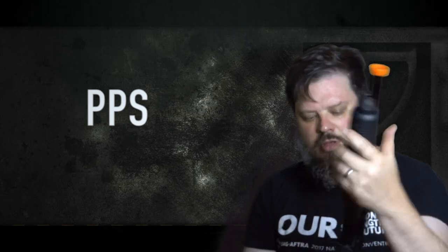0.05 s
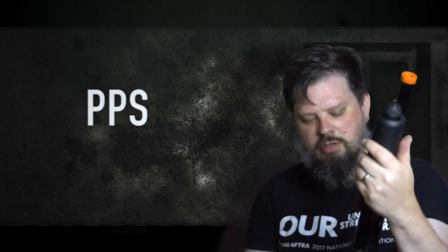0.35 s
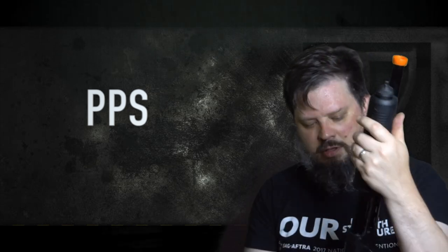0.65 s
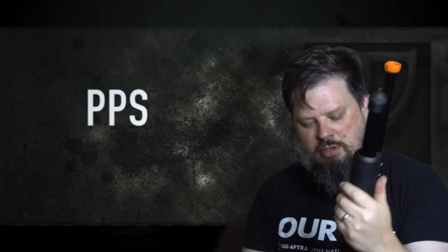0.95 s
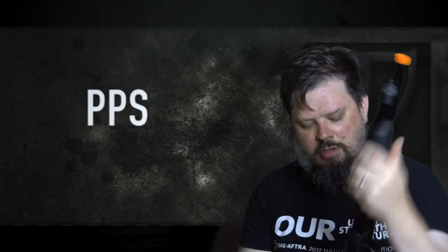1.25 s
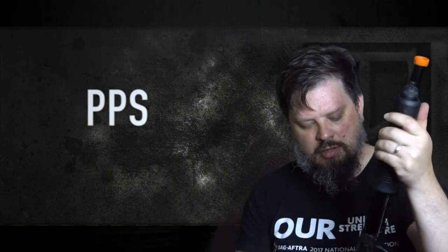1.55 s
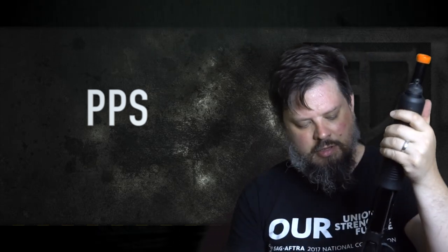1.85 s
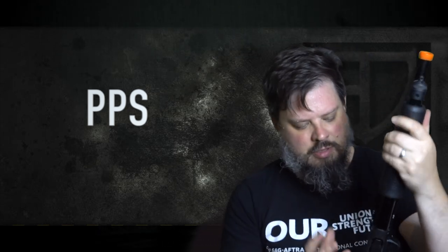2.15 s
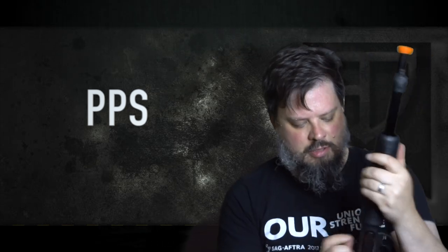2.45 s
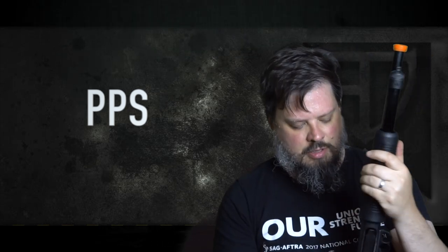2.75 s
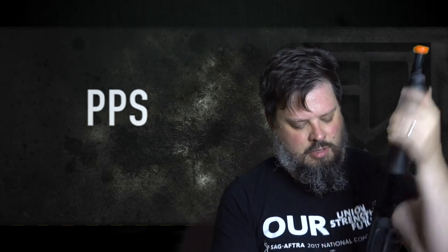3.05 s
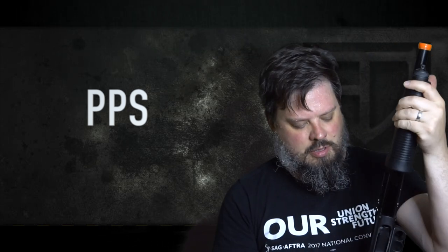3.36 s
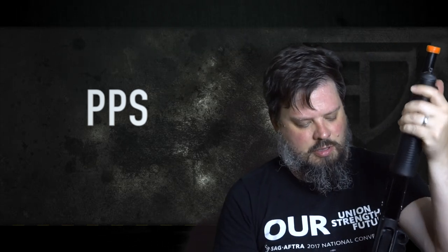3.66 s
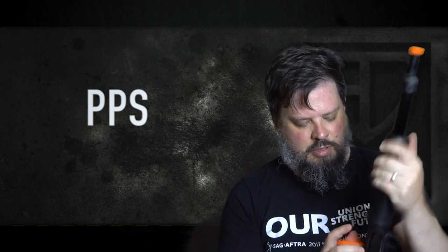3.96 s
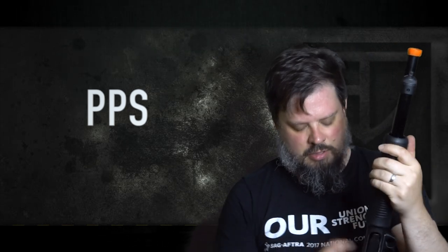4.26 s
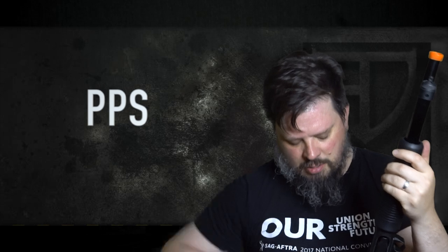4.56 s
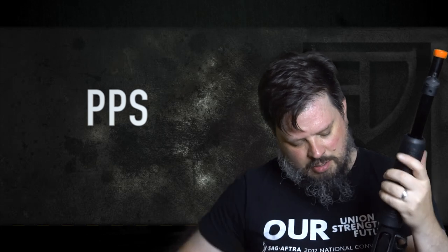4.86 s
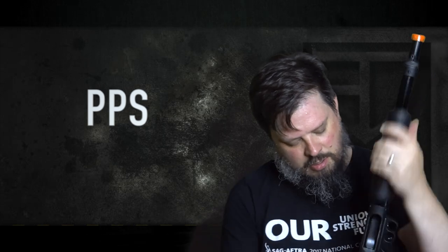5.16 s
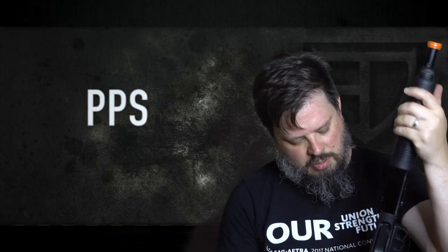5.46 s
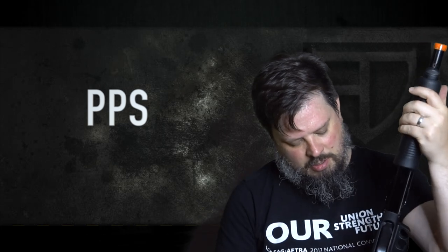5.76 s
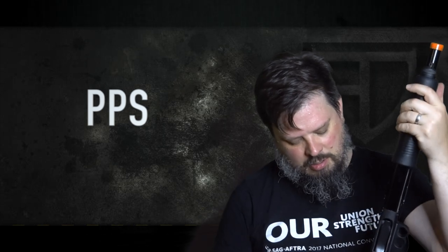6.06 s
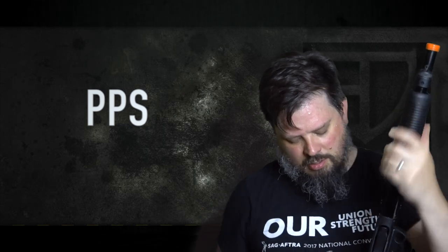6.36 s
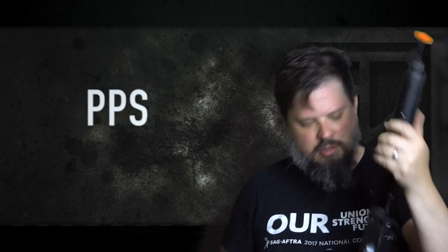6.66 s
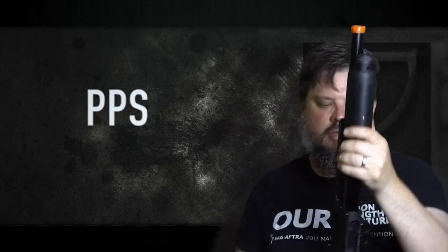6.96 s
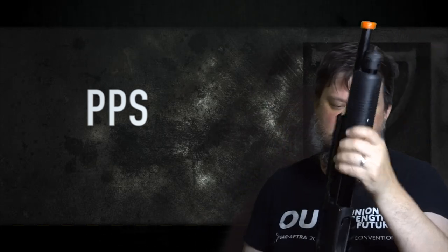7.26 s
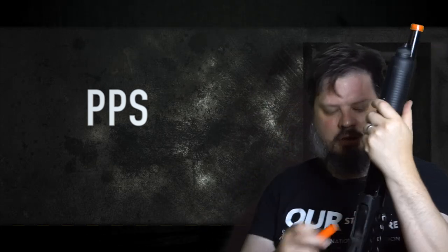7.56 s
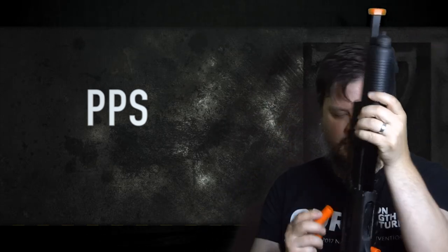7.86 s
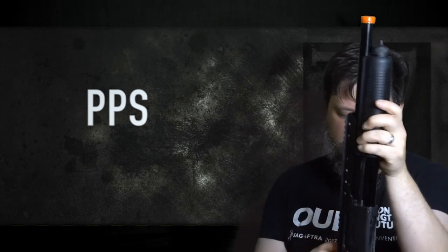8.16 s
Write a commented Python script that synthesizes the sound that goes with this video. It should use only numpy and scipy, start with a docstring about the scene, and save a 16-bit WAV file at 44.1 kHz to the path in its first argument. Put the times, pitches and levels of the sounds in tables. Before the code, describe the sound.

A toy pump shotgun is racked again and again in a small room, with sharp plastic clacks and a few short gas puffs.

```python
"""Hands rub on plastic over a faint hum, then clacks begin: a gas-powered toy pump shotgun is racked
again and again, about a metre from a stereo microphone in a small room. Each stroke scrapes along the
rails by friction and ends in impacts that excite the shell's resonances; a spring rings on.
Three trigger pulls release a turbulent puff of gas. Between strokes the grip shifts; a sleeve rustles."""
import sys
import numpy as np
from scipy import signal
from scipy.fft import rfft, irfft, next_fast_len
from scipy.io import wavfile
from scipy.ndimage import uniform_filter1d, minimum_filter1d

SR = 44100
rng = np.random.default_rng(int(sys.argv[2]) if len(sys.argv) > 2 else 0)


def store_wav(level_fs):
    """Save 16-bit WAV to argv[1]."""
    pcm = np.round(np.clip(np.atleast_2d(level_fs), -1, 1) * 32767)
    wavfile.write(sys.argv[1], SR, pcm.T.astype(np.int16))


N = 366471


def amp(db):
    """Amplitude ratio of a level."""
    return 10 ** (np.asarray(db) / 20)

def unit(x):
    """Normalisation to rms 1."""
    return x / np.sqrt(np.mean(x ** 2) + 1e-20)

def along(points, hz):
    """Interpolation of (f/Hz, value) points on a logarithmic frequency axis."""
    f, v = np.transpose(points)
    return np.interp(np.log(hz + 1), np.log(f + 1), v)

def clock(seconds):
    """Sample times of a span."""
    return np.arange(int(seconds * SR)) / SR

def add(track, s, x):
    """Superposition of x on the track from time s."""
    start = max(round(s * SR), 0)
    part = x[:max(N - start, 0)]
    track[start:start + len(part)] += part

def filtered(x, response):
    """Linear filtering: the spectrum of x times a frequency response."""
    n = x.shape[-1]
    m = next_fast_len(n + SR // 4)
    return irfft(rfft(x, m) * response(np.fft.rfftfreq(m, 1 / SR)), m)[..., :n]

def band(x, lo_hz, hi_hz, order=2):
    """Causal Butterworth band-pass."""
    sections = signal.butter(order, [lo_hz, min(hi_hz, .49 * SR)], "band", fs=SR, output="sos")
    return signal.sosfilt(sections, x)

def coloured(x, spectrum):
    """Spectral shaping of x, at rms 1."""
    return unit(filtered(x, lambda hz: amp(along(spectrum, hz))))

def grit(n, rate_hz, depth_db):
    """Random amplitude modulation of noise, as rough surfaces catch; rms 1."""
    knots = rng.standard_normal(n)
    level_db = depth_db * np.interp(np.arange(n) * rate_hz / SR, np.arange(n), knots)
    return unit(rng.standard_normal(n) * amp(level_db))

def gates(rows, rise_s, fall_s):
    """Trapezoidal envelopes from rows of start t/s, end t/s, level/dB."""
    track = np.zeros(N)
    for start, end, db in rows:
        t = clock(end - start)
        add(track, start, amp(db) * np.clip(t / rise_s, 0, 1) * np.clip((end - start - t) / fall_s, 0, 1))
    return track


# Changes of grip, and the arm's one reach: start t/s, end t/s, relative level/dB
GRIPS = [(0, 0.111, -37.5), (0.201, 0.501, -54.5), (0.495, 0.664, -41), (2.428, 2.552, -31),
         (3.198, 3.316, -45), (3.726, 3.954, -41), (6.28, 6.486, -51), (6.69, 7.045, -40),
         (7.439, 7.56, -34.5), (7.845, 8.09, -41.5), (8.1, 8.31, -41.5)]
REACH = (4.28, 4.94, -50)
# Friction spectra of skin and cloth: f/Hz, relative level/dB
SKIN_SPECTRUM = [(88, -63), (150, -25.5), (612, -13.5), (1020, -9.5), (1170, -8.5), (1830, -3.5),
                 (3350, -7), (4240, -8), (12200, -15.5), (16000, -19.5)]
CLOTH_SPECTRUM = [(240, -53), (400, -31), (753, -31.5), (1010, -14), (3640, -6), (5190, -4.5), (8110, -4.5),
                  (16000, -13)]
def handling(press_s=0.032, press_db=-32):
    """Friction noise: palms rub at each grip and press before each single clack; a sleeve brushes past."""
    presses = [(s - press_s, s, db + press_db) for s, db, *_ in SINGLE_CLACKS]
    pressure = gates(GRIPS, rise_s=0.0069, fall_s=0.023) + gates(presses, rise_s=0.012, fall_s=0.0022)
    palms = pressure * coloured(grit(N, rate_hz=290, depth_db=5), SKIN_SPECTRUM)
    sleeve = gates([REACH], rise_s=0.029, fall_s=0.22) * coloured(rng.standard_normal(N), CLOTH_SPECTRUM)
    return amp(-3.5) * (palms + sleeve)

# Coherence of the diffuse field: f/Hz, left-right correlation
COHERENCE = [(100, 0.86), (600, 0.6), (1400, 0.6), (3000, 0.28), (9000, 0.044)]
def diffuse(pair):
    """Spatial coherence: two close capsules hear a diffuse field alike at long wavelengths."""
    def weights(hz):
        angle = np.arccos(np.clip(along(COHERENCE, hz), -1, 1)) / 2
        return np.array([np.cos(angle), np.sin(angle)])
    mid, side = filtered(pair, weights)
    return np.array([mid + side, mid - side])

# Ambient hiss: f/Hz, relative level/dB
HISS_SPECTRUM = [(15, -47.5), (25, -16), (173, -14), (274, -10.5), (359, -13), (389, -14), (445, -11),
                 (15500, -18.5)]
# Drift of rumble and hum: t/s, relative level/dB
LOW_DRIFT = [(0.0, -54), (1.78, -68), (2.2, -61.5), (2.61, -72), (7.1, -63.5), (8.31, -51)]
def background():
    """Noise in three bandwidths: broad hiss, low rumble and a band so narrow that it hums unsteadily."""
    hiss = amp(-58.5) * diffuse(coloured(rng.standard_normal((2, N)), HISS_SPECTRUM))
    rumble = unit(diffuse(band(rng.standard_normal((2, N)), 39, 160)))
    hum = unit(band(rng.standard_normal(N), 52.8, 61))
    drift = amp(np.interp(np.arange(N) / SR, *np.transpose(LOW_DRIFT)))
    return hiss + drift * (amp(-1.5) * rumble + amp(-2.5) * hum)

def scatter(start, end, rate_hz, db, knock_db, treble_db, ring_hz, spread_db=3.5, spread_octaves=0.37):
    """A random point process: impact rows for clacks() at log-normal intervals, each on another part."""
    chance = rng.standard_normal((32, 3))
    gaps = np.exp(0.5 * chance[:, 0]) / rate_hz
    times = start + np.cumsum(gaps) - gaps
    levels = db + spread_db * chance[:, 1]
    rings = ring_hz * 2 ** (spread_octaves * np.clip(chance[:, 2], -2, 2))
    return [(s, level, knock_db, treble_db, hz) for s, level, hz in zip(times, levels, rings) if s < end]

def taps(rate_hz=16):
    """Soft impacts are dull: rows for the loose parts that tap under the hands."""
    rows = []
    for start, end, db in GRIPS:
        first = start + 1 / rate_hz
        rows += scatter(first, end, rate_hz, db + 10.5, knock_db=-18.5, treble_db=-21.5, ring_hz=2600)
    return rows

# Modes of receiver and stock: f/Hz, bandwidth/Hz, relative level/dB
SHELL_MODES = [(356.5, 100, -18), (790, 234, -9), (1017, 127, -3), (1293, 54, -1.5), (1560, 228, 0.5),
               (1858, 195, 8), (2260, 160, -15), (2340, 53, 2), (3320, 330, -5), (4423, 160, 13)]
def shell_response(hz):
    """Modal superposition: the shell responds as a sum of damped resonators of alternating sign."""
    return sum((-1) ** k * amp(db) * 1j * hz * width / (centre ** 2 - hz ** 2 + 1j * hz * width)
               for k, (centre, width, db) in enumerate(SHELL_MODES))

def strength(x):
    """Normalisation to the energy of 5 ms at rms 1."""
    return x / np.sqrt(np.sum(x ** 2) / (.005 * SR))

# Impacts of latch, shell and fore-end: t/s, relative level/dB, knock weight/dB, treble weight/dB, ring f/Hz
SINGLE_CLACKS = [(0.124, -21.5, -20, -13, 2160), (0.148, -17, -15, -10, 4320), (0.398, -27, -15, -29, 2725),
                 (0.53, -23.5, -28, -6.5, 4900), (0.632, -22, -8, -38, 1770),
                 (0.757, -23.5, -21, -16, 4210), (0.775, -11.5, -25, -27, 2400),
                 (0.799, 0.5, -22, -21, 2670), (0.842, -9.5, -30, 2, 4760), (0.871, 1.5, -11.5, -10, 5000),
                 (1.136, -9, -14.5, -3, 3700), (1.196, -15.5, -20, -34, 2620),
                 (1.234, -13, -12.5, -22, 4220), (1.269, -5, -28, -11, 2140),
                 (1.322, -3.5, -11, -12.5, 2150), (2.135, -8, -25.5, -18, 2510),
                 (2.233, -10, -20.5, -11.5, 3150), (2.268, -7, -19.5, -16, 1860),
                 (2.372, 0, -18.5, -11, 2050), (2.516, -11.5, -24, -3.5, 1874), (2.56, -23, -22, 1, 3520),
                 (2.929, -20.5, -24, -16, 4320), (2.961, -14.5, -24, -18.5, 1920),
                 (2.985, -14.5, -18, -18, 3200), (3.053, -5.5, -12, -15, 1990),
                 (3.252, -17.5, -38, -26, 3256), (3.286, -24.5, -33, -33, 4070),
                 (3.318, -31.5, -38, -44, 3180), (3.414, -34, -18, -16, 3420), (3.444, -22, -24, -4, 3900),
                 (3.758, -5.5, -27, -14.5, 1950), (3.881, -10, -24.5, -15.5, 1730),
                 (4.076, -10.5, -26, -13.5, 4440), (4.172, -30, -25, -34, 2000),
                 (4.93, -31, -16.5, -30, 3230), (5.13, -15, -23, -28, 2626), (5.15, -3.5, -26.5, -14, 2960),
                 (5.268, -2, -36, -5.5, 2330), (5.511, -9.5, -22.5, -14, 3290),
                 (5.619, -22.5, -40, -18.5, 2830), (5.813, -14, -19, -26, 2860),
                 (6.103, -24, -37, -6.5, 5830), (6.217, -22, -35, -29, 2400),
                 (6.248, -3.5, -27, -15.5, 2110), (6.516, -22, -21.5, -20.5, 2960),
                 (6.603, -5, -34, -18.5, 1860), (6.8, -9, -28, -16, 3230), (6.892, -12.5, -14, -18.5, 1940),
                 (6.998, -18, -14, -18, 1830), (7.025, -5, -23, -23, 2630), (7.139, -15, -20, -18, 3270),
                 (7.283, -31.5, -22, -16, 3700), (7.338, -8, -24, -18, 1860), (7.358, -3, -21, -20, 1910),
                 (7.529, -25, -5.5, -19, 1873), (7.595, -8.5, -21.5, -13.5, 3307),
                 (7.804, -25, -18, -11, 2560), (7.879, -20, -21, -23, 3296),
                 (7.987, -18.5, -15.5, -21, 1440), (8.102, -10.5, -17, -13.5, 2850),
                 (8.119, -12, -31, -15.5, 2760), (8.151, -10.5, -16, -17.5, 3380),
                 (8.288, -20.5, -17, -10.5, 4170)]
def clacks(impacts, chatter_s=0.0033, relative_width=0.14, crack_t60=0.016, rattle_t60=0.092):
    """Impact excitation: a chattering contact force knocks the shell and rings the struck part."""
    track, t = np.zeros(N), clock(.12)
    chatter = amp(-60 * np.maximum(t - chatter_s, 0) / crack_t60)
    rattle = amp(-13 - 60 * t / rattle_t60)
    contact = (chatter + rattle) * (1 - np.exp(-t / 0.00058))
    edge_ratio = 1 + relative_width / 2  # damping broadens the part's resonance to a hollow clack
    for s, db, knock_db, treble_db, ring_hz in impacts:
        force = grit(len(t), rate_hz=1500, depth_db=5) * contact
        shell = filtered(force, shell_response)
        knock = strength(band(shell, 320, 1297, order=4))
        upper_modes = strength(band(shell, 1300, 7400))
        crack = strength(band(force, 2240, 6790, order=3))
        top_hz = np.interp(treble_db, [-20, -6], [10500, 17000])  # soft contacts are duller
        treble = strength(band(force, 8680, top_hz))
        ring = strength(band(force, ring_hz / edge_ratio, ring_hz * edge_ratio))
        middle = amp(-10) * crack + amp(-16.5) * upper_modes + amp(-13) * ring
        add(track, s, amp(db) * (middle + amp(knock_db - 4) * knock + amp(treble_db - 3.5) * treble))
    return track

# Pump strokes: start t/s, slam t/s, then relative level/dB of scrape, slam, spring and thud
PUMP_STROKES = [(0.803, 0.902, -21, 6, -54, -31.5), (1.245, 1.332, -18.5, 6, -29.5, -34),
                (2.285, 2.328, -20.5, -3.5, -43, -44), (2.999, 3.081, -19.5, 6.5, -51, -42),
                (3.949, 3.985, -22.5, 2.5, -34, -41.5), (5.182, 5.292, -22.5, 5.5, -49, -46),
                (6.627, 6.638, -27.5, -0.5, -56, -47), (7.367, 7.378, -26.5, 3, -56, -49)]
# Friction spectrum of the rails: f/Hz, relative level/dB
RAIL_SPECTRUM = [(35, -63.5), (60, -35.5), (167, -35), (368, -21), (533, -26), (773, -18), (910, -9.5),
                 (1020, -13), (1670, -10.5), (1960, -3.5), (4120, -5), (8870, -3), (13800, -14),
                 (15500, -25)]
def slide(run_on_s=0.04):
    """Sliding friction: the fore-end scrapes and catches on its rails until just after the slam."""
    runs = [(start, slam + run_on_s, db) for start, slam, db, *_ in PUMP_STROKES]
    scrape = amp(4.5) * coloured(grit(N, rate_hz=450, depth_db=4.5), RAIL_SPECTRUM)
    return gates(runs, rise_s=0.0031, fall_s=0.01) * scrape

def bolt(rattle_per_s=40, rebound_s=0.009, rebound_db=-3.5):
    """Inelastic collision: impact rows as the bolt rattles along, slams home and rebounds more weakly."""
    slam_colour = (-21, -11.5, 2015)  # knock/dB, treble/dB, f/Hz
    rows = []
    for start, slam, scrape_db, slam_db, _, _ in PUMP_STROKES:
        rows += scatter(start, slam, rattle_per_s, scrape_db + 7.5,
                        knock_db=-29.5, treble_db=0.5, ring_hz=3800)
        rows += [(slam, slam_db, *slam_colour), (slam + rebound_s, slam_db + rebound_db, *slam_colour)]
    return rows

def thuds(t60=0.063):
    """Momentum transfer: at each slam the gun's mass recoils in the hands with a short, dull push."""
    push, t = np.zeros(N), clock(.2)
    for _, slam, *_, db in PUMP_STROKES:
        add(push, slam, amp(db - 60 * t / t60) * (1 - np.exp(-t / 0.0017)))
    return push * unit(band(rng.standard_normal(N), 39, 330))

def spring(ring_hz=1968, t60=1.1):
    """Damped free vibration: the spring rings in one thin tone after each slam and trigger pull."""
    track, t = np.zeros(N), clock(1.8)
    slams = [(slam, db) for _, slam, _, _, db, _ in PUMP_STROKES]
    pulls = [(s, db) for s, _, _, db in TRIGGER_PULLS]
    for s, db in slams + pulls:
        add(track, s, amp(db - 60 * t / t60) * np.sin(2 * np.pi * ring_hz * t))
    return track

def trigger(lead_s=0.006):
    """Release of stored energy: impact rows as the sear ticks and the hammer strikes the valve."""
    sear, hammer = (-18.5, -39, -4, 4480), (-5, -39, -6.5, 2230)  # level/dB, knock/dB, treble/dB, f/Hz
    return [row for s, *_ in TRIGGER_PULLS for row in [(s - lead_s, *sear), (s, *hammer)]]

# Valve openings: t/s, relative gas level/dB, time for the flow to fall to 1/e t/s, relative spring level/dB
TRIGGER_PULLS = [(1.745, -23, 0.1, -44), (3.468, -22, 0.094, -52), (5.833, -21, .11, -37)]
# Spectrum of the jet: f/Hz, relative level/dB
JET_SPECTRUM = [(88, -88), (150, -57), (240, -32.5), (315, -32.5), (702, -22.5), (888, -14), (1120, -19),
                (1450, -15), (1870, -1.5), (2270, -4.5), (2600, -3), (4670, -8.5), (6390, -5),
                (12900, -13.5), (16000, -21)]
def gas():
    """Turbulent jet noise: the hiss starts at once, sounds the barrel and falls with the pressure."""
    flow, t = np.zeros(N), clock(.4)
    for s, db, life_s, _ in TRIGGER_PULLS:
        add(flow, s, amp(db) * (1 - np.exp(-t / 0.0013)) * np.exp(-(t / life_s) ** 2))
    barrel = unit(band(rng.standard_normal(N), 1780, 2000))
    jet = coloured(rng.standard_normal(N), JET_SPECTRUM)
    return flow * (amp(2.5) * jet + amp(-17.5) * barrel)

# Reverberation time: f/Hz, T60/s
ROOM_T60 = [(150, 0.5), (530, 0.44), (1400, 0.39), (3700, 0.37), (8000, 0.33), (13000, 0.25)]
def room_response(early_db=3, early_t60=0.024, delay_s=0.002):
    """Stereo impulse response: dense early reflections, then a short tail whose treble dies first."""
    hz, t, noise = signal.stft(rng.standard_normal((2, int(.6 * SR))), SR, nperseg=256)
    decay = amp(-60 * t / along(ROOM_T60, hz)[:, None]) + amp(early_db - 60 * t / early_t60)
    tail = diffuse(signal.istft(noise * decay, SR, nperseg=256)[1])
    return np.pad(tail / np.linalg.norm(tail[0]), ((0, 0), (int(delay_s * SR), 0)))

def room(x, places=4, moves_per_s=45):
    """Reverberation depends on source position: the moving gun fades from one response to the next."""
    place = np.arange(N) / SR * moves_per_s
    wet = np.zeros((2, N))
    for k in range(places):
        share = np.sin(np.pi / 2 * np.minimum((place + k) % places, 2))
        wet += signal.oaconvolve((x * share)[None], room_response(), axes=1)[:, :N]
    return wet

def scene(right_db=0.66, room_db=0.5):
    """Direct and reverberant fields add; the gun is a little to the right, the spring heard only direct."""
    ambient = background()
    noises = handling() + slide() + thuds() + gas()
    impacts = taps() + SINGLE_CLACKS + bolt() + trigger()
    direct = noises + clacks(impacts)
    # the far side of the gun radiates its own version of each clack to the walls
    far_side = noises + clacks(impacts, chatter_s=0.0059, relative_width=0.36)
    gun = amp(-0.5) * (direct + amp(room_db) * room(far_side)) + spring()
    return gun * amp([[-right_db], [right_db]]) + ambient

def record(dry, top_hz=15950):
    """Peak and band limiting: a fast gain dip holds the hardest clacks, then a steep low-pass follows."""
    needed = 1 / np.maximum(np.abs(dry).max(axis=0), 1)
    gain = uniform_filter1d(minimum_filter1d(needed, size=89), size=89)
    return filtered(dry * gain, lambda hz: 1 / np.sqrt(1 + (hz / top_hz) ** 240))


dry = scene()
out = record(dry)
store_wav(out)
```